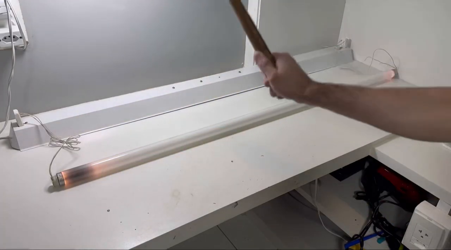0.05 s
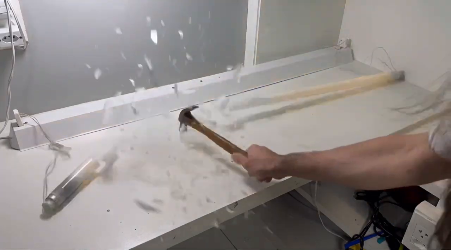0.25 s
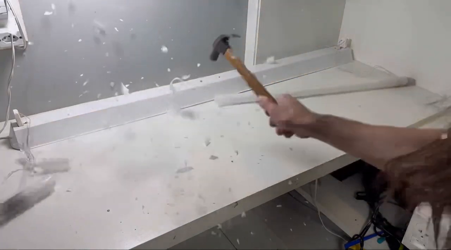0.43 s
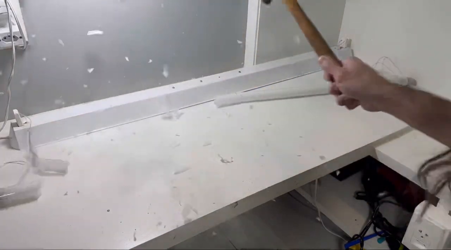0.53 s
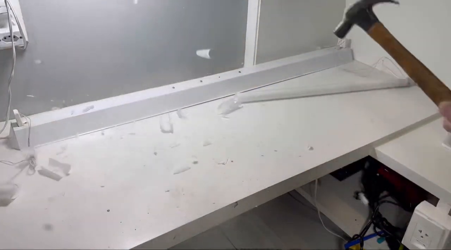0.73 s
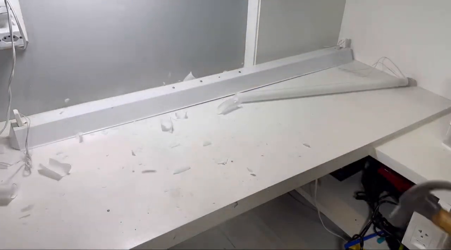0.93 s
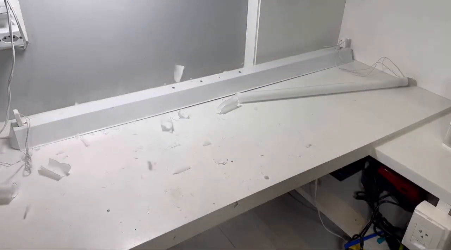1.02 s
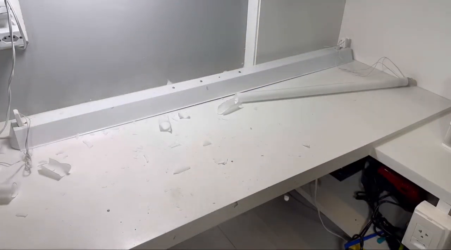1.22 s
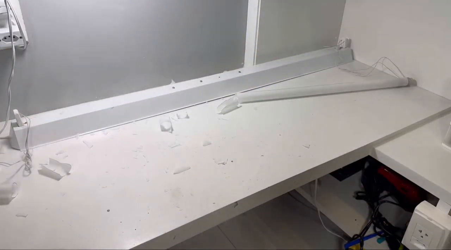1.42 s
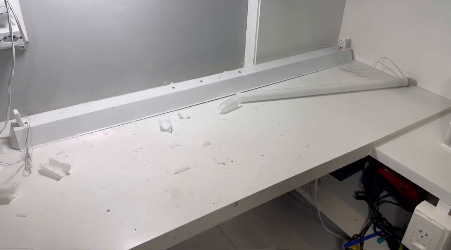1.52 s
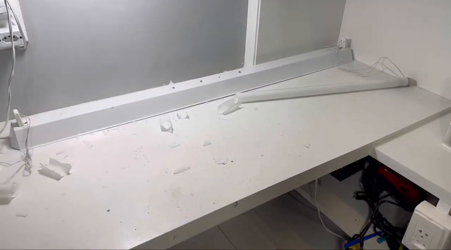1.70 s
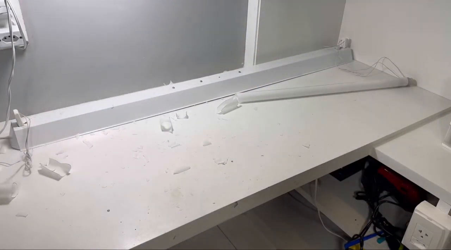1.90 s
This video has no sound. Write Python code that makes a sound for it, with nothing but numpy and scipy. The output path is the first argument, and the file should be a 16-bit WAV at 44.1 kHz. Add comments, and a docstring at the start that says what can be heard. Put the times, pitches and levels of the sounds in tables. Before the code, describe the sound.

Glass tube smashed by a hammer: brief electrical hum, loud explosive pop with a desk thump, dense bright glass rain, scattered knocks and sparse high tinkles fading into quiet, recorded close in a small room.

```python
"""In a small room, a hammer smashes a lit fluorescent tube on a desk.
The lamp's ballast buzzes (a stack of sine tones); the glass rings for an instant (fading tones) and cracks
(swelling noise), then the tube implodes with a boom that shakes the desk (dying noise and low tones).
Splinters shower down (many random taps), a long piece lands and rocks (wavering tones),
fragments knock (short noises), and the last small shards bounce and tinkle over a faint rumble and hiss."""
import sys
import numpy as np
from scipy import signal
from scipy.fft import rfft, irfft
from scipy.io import wavfile

SR = 44100
rng = np.random.default_rng(int(sys.argv[2]) if len(sys.argv) > 2 else 0)


def wav_out(sig):
    """Save sig, one row per channel (or a flat mono array), as 16-bit PCM at SR to the path in sys.argv[1]."""
    wavfile.write(sys.argv[1], SR, np.round(np.clip(np.atleast_2d(sig).T, -1, 1) * 32767).astype(np.int16))


N = 85995  # length of the scene in samples
T = np.arange(N) / SR  # time of each sample [s]
HZ = np.fft.rfftfreq(N, 1 / SR)  # frequencies in the spectrum of a full-length sound [Hz]
# Everywhere below, t60 is the time a sound takes to fall by 60 dB.


def amp(db):
    """Turns decibels into a gain."""
    return 10 ** (np.asarray(db) / 20)


def evened(x):
    """Scales a sound to an average strength (rms) of 1."""
    return x / np.sqrt(np.mean(x ** 2) + 1e-20)


def read(points, hz):
    """Reads a table between its points, on a log-frequency axis as the ear hears pitch."""
    f, value = np.transpose(points)
    return np.interp(np.log(hz + 1), np.log(f + 1), value)


def level(points):
    """Gives the gain over time from (time [s], level [dB]) points."""
    return amp(np.interp(T, *np.transpose(points)))


def at(s, x):
    """Delays a sound so that it starts at s seconds."""
    delay = max(round(s * SR), 0)
    channels_alone = [(0, 0)] * (x.ndim - 1)
    return np.pad(x, channels_alone + [(delay, 0)])[..., :N]


def lengthened(x):
    """Fills a short sound up with silence to the length of the scene."""
    return np.pad(x, (0, N - len(x)))


def colour(x, db):
    """Filters a sound by a gain in dB for each frequency."""
    return irfft(rfft(x) * amp(db), N)


def spread(x):
    """Makes two unrelated channels as alike as a diffuse sound is at the two microphones."""
    # likeness of left and right: (frequency [Hz], likeness [-1 to 1])
    likeness = [(60, .95), (170, .93), (350, .4), (800, 0.084), (2500, -0.092), (6000, 0), (9000, .3),
                (12000, 0.61), (15000, .3)]
    a, b = rfft(x)
    same = np.clip(read(likeness, HZ), -.99, .99)
    mid = a * np.sqrt((1 + same) / 2)
    side = b * np.sqrt((1 - same) / 2)
    return irfft(np.array([mid + side, mid - side]), N)


def noise(db):
    """Makes diffuse stereo noise with a given spectrum, scaled to rms 1."""
    return evened(colour(spread(rng.standard_normal((2, N))), db))


def dying(x, t60s, hold=0):
    """Holds a sound for a while, then lets each frequency band die at its own speed."""
    hz, t, bands = signal.stft(x, SR, nperseg=256)
    fall_s = np.maximum(t - hold, 0)
    bands = bands * amp(-60 * fall_s / read(t60s, hz)[:, None])
    return signal.istft(bands, SR, nperseg=256)[1][:, :N]


def ring(hz, db, t60):
    """One struck mode: a thing that is hit sings at its own pitch and fades steadily."""
    t = T[:int(2 * t60 * SR) + 2]
    return lengthened(amp(db - 60 * t / t60) * np.sin(2 * np.pi * hz * t))


def fluttering(hz, db, t60, depth):
    """A mode of a tumbling, rattling piece: its strength and phase waver at random as it fades."""
    flutter_hz = 45  # two new random values in each cycle
    t = T[:int(1.5 * t60 * SR) + 2]
    a, b = (np.interp(t * 2 * flutter_hz, np.arange(len(s)), s)
            for s in rng.standard_normal((2, 200)) / np.sqrt(2))
    turn = 2 * np.pi * hz * t
    wave = ((1 + depth * a) * np.sin(turn) + depth * b * np.cos(turn)) / np.hypot(1, depth)
    return lengthened(amp(db - 60 * t / t60) * wave)


def click(db):
    """The bright tick of glass touching something hard: a tiny burst of treble-heavy noise."""
    fade_s = .0015  # time to fall to about a third
    t = T[:N // 100]
    hiss = np.diff(rng.standard_normal(len(t) + 1))  # differences favour the treble
    return lengthened(amp(db) * evened(hiss) * np.exp(-t / fade_s))


def room(x, wet_db):
    """Adds the small room's tail: echoes so dense that they act like dying noise."""
    # how fast the tail dies: (frequency [Hz], t60 [s])
    room_t60 = [(100, 1.03), (1000, 0.49), (5000, 0.94), (15000, 0.5)]
    tail = dying(noise(0 * HZ), room_t60) * np.minimum(T / 0.0065, 1)  # builds up over 6.5 ms
    tail /= np.sqrt(np.sum(tail ** 2) / 2)
    return x + amp(wet_db) * signal.fftconvolve(np.atleast_2d(x), tail, axes=1)[:, :N]


def hammer():
    """The tube rings, a crack races through it with swelling noise, and the hammer head punches on."""
    # tones of the tube under the hammer, before it gives: (frequency [Hz], level [dB], t60 [s])
    tube = [(540, -29, 0.13), (3000, -42, .5), (5320, -37.5, .6), (6560, -38, 0.46), (7381, -44.5, .1),
            (10100, -49.5, .3)]
    # spectrum of the crack: (frequency [Hz], relative level [dB per Hz])
    crack_spectrum = [(59, -40), (100, -10.5), (1040, -2.5), (1840, -3.5), (2520, -18), (5280, -14.5),
                      (5870, -17), (7100, -5.5), (8230, -17.5), (13700, -17), (15500, -33)]
    touch_s, crack_s = .1865, .2145
    crack_db, grow_db_per_ms, fall_db_per_ms, crack_wet_db = -4.5, 3, 4, -13
    touch = at(touch_s, sum(ring(*mode) for mode in tube) * np.minimum(T / 0.0036, 1))
    ms = (T - crack_s) * 1000  # time before (-) and after (+) the loudest moment
    # the crack runs faster and faster, then stops
    swell_db = np.minimum(ms * grow_db_per_ms, -ms * fall_db_per_ms)
    crack = noise(read(crack_spectrum, HZ)) * amp(crack_db + np.maximum(swell_db, -200))
    push = at(crack_s, ring(hz=950, db=-10.5, t60=.022))
    touch = touch * np.clip(-ms, 0, 1)  # the ringing ends within the last millisecond
    return touch + room(crack + push, crack_wet_db)


def implosion():
    """Air slams into the tube as a burst of noise; desk and room boom at their own pitches."""
    # spectrum of the blast: (frequency [Hz], relative level [dB per Hz])
    blast_spectrum = [(18, -46), (30, -16.5), (81, -2.5), (126, -14), (164, -1), (277, -7.5), (315, -1),
                      (379, -9), (443, -2), (591, -23), (639, -14), (1200, -11), (1590, -20.5),
                      (1820, -21.5), (2070, -24), (11300, -30), (15500, -34)]
    # how fast the blast dies: (frequency [Hz], t60 [s])
    blast_t60 = [(50, .6), (150, 0.49), (400, .55), (1200, .55), (4000, 0.81), (14000, .8)]
    # tones of desk and room: (frequency [Hz], relative level [dB], t60 [s])
    desk_modes = [(53.3, -4.5, 0.55), (91, -2.5, 0.49), (178, -6.5, 0.56), (334.2, -2, 0.43),
                  (458.7, -2, 0.31), (660, -10, 0.44), (840, -6.5, 0.23), (902, -16, 0.57),
                  (975, -13.5, 0.33), (1073, -11.5, 0.42), (1213, -11.5, 0.32), (1268, -13, 0.63)]
    boom_s, rise_s, hold_s = .2245, .003, .025
    blast_db, desk_db = -11.5, -22
    blast = amp(blast_db) * dying(noise(read(blast_spectrum, HZ)), blast_t60, hold_s)
    desk = sum(rng.choice([-1, 1]) * ring(hz, db + desk_db, t60) for hz, db, t60 in desk_modes)
    return at(boom_s, (blast + desk) * np.minimum(T / rise_s, 1))


def shower(spectrum, loudness, low_hz, high_hz, per_s, t60, scatter_db, tick_db, count):
    """Many splinters, each with its own two pitches, tap down at random, left and right."""
    start_s, wet_db = .2245, -0.5
    out = np.zeros((2, N))
    for hz in np.geomspace(low_hz, high_hz, count):
        pitch, length, overtone, side = rng.random(4)
        hz = hz * (1 + .1 * (pitch - .5))
        low_tone = ring(hz, 0, t60 * (.5 + length))
        high_tone = ring(min(hz * (1.5 + overtone), SR / 2), -3, t60 / 2)
        tap = (low_tone + high_tone + click(tick_db))[:N // 12]
        struck = rng.random(N) < per_s / count / SR  # all splinters share per_s taps a second
        hits = struck * amp(scatter_db * np.minimum(rng.exponential(1, N), 3))
        pan = np.array([[np.cos(np.pi * side)], [np.sin(np.pi * side)]])
        out += pan * signal.oaconvolve(hits, tap)[:N]
    shaped = evened(colour(room(spread(out), wet_db), read(spectrum, HZ)))
    return shaped * level(loudness) * (T > start_s)


def falling_glass():
    """Coarse splinters, fine ones and a bright jingle of thin flakes: smaller glass taps higher."""
    # loudness of each shower: (time [s], level [dB])
    coarse_level, fine_level, flake_level = [(.22, -60), (.25, -42), (.5, -36), (.63, -42.5), (.8, -46),
                                             (.95, -47), (1.1, -56), (1.42, -60), (1.55, -63),
                                             (1.95, -71.5)], [(.22, -65), (.25, -37.5), (.45, -34.5),
                                                                   (.63, -40), (.77, -36), (.84, -35.5),
                                                                   (1, -41), (1.2, -42.5), (1.4, -48),
                                                                   (1.52, -55), (1.75, -56.5),
                                                                   (1.95, -64.5)], [(.22, -70),
                                                                                       (.26, -35),
                                                                                       (.42, -37),
                                                                                       (.6, -46),
                                                                                       (.75, -45),
                                                                                       (.82, -38), (1, -44),
                                                                                       (1.2, -49),
                                                                                       (1.4, -58),
                                                                                       (1.55, -58),
                                                                                       (1.7, -66),
                                                                                       (1.95, -78)]
    # tone colour put on each shower: (frequency [Hz], gain before levelling [dB])
    coarse_colour, fine_colour, flake_colour = [(100, -21), (300, -12), (750, -3), (1200, -4), (2500, -5),
                                                (5000, -21), (15000, -43)], [(500, -24), (2000, -8), (4000, 0),
                                                                (7000, 0), (10000, -0.5), (12000, -2),
                                                                (15500, -7)], [(1000, -25), (4000, -6),
                                                                              (8000, -1), (11500, 0),
                                                                              (15500, -3)]
    coarse = shower(coarse_colour, coarse_level, low_hz=450, high_hz=4001, per_s=500, t60=.05,
                    scatter_db=1.5, tick_db=-2, count=36)
    fine = shower(fine_colour, fine_level, low_hz=2498, high_hz=15050, per_s=600, t60=.03,
                  scatter_db=4.5, tick_db=9, count=40)
    flakes = shower(flake_colour, flake_level, low_hz=4000, high_hz=15000, per_s=130, t60=.06,
                    scatter_db=3, tick_db=0, count=70)
    return coarse + fine + flakes


def long_piece():
    """A length of tube lands and rocks; each touch wakes its modes in a different mix."""
    # tones of the piece, before random changes: (frequency [Hz], relative level [dB], t60 [s])
    piece_modes = [(765, -2, 0.04), (1754, -10.5, 0.46), (4385, -1, .7), (5790, -8, .45), (6588, -8, .5),
                   (7120, -5, .5), (8070, 3, .45), (9050, -5, .25), (9465, -9, .5), (11080, -1, .45),
                   (11400, -3, .15), (11900, -1, .15), (12770, 4, .18), (13900, -7, .12), (15150, -3, .2)]
    # its touches: (time [s], level [dB], brightness [dB per octave])
    landings = [(.778, -43, 3), (.785, -38.5, 1), (.793, -40, 3), (.802, -43, 2), (.853, -48, 0),
                (.94, -51, -1.5), (1.005, -52, 6), (1.062, -53, 8.5), (1.165, -49.5, 3), (1.205, -54, -1),
                (1.32, -66, -1)]
    scatter_db, detune, flutter = 2.5, .0025, 1.3  # detune is a share of the pitch
    click_db, wet_db = 11, -5
    out = np.zeros(N)
    for s, db, tilt_db in landings:
        touch = click(click_db)
        for hz, mode_db, t60 in piece_modes:
            a, b = rng.standard_normal(2)
            mixed_db = mode_db + scatter_db * b + tilt_db * np.log2(hz / 8000)
            touch = touch + fluttering(hz * (1 + detune * a), mixed_db, t60, flutter)
        out += at(s, amp(db) * touch)
    return room(out, wet_db)


def shards():
    """Small shards hit the desk and ping, some with a tick; the last pings share nearly one pitch."""
    # hits: (time [s], pitch [Hz], ring level [dB], t60 [s], tick level [dB])
    shard_hits = [(.3697, 13600, -27, .04, -30), (.373, 11900, -30, .04, -30),
                  (.4081, 11460, -27, .06, -31), (.523, 9500, -35, .08, -50), (.6216, 11400, -36, .04, -34),
                  (.692, 3960, -38, .08, -50), (.7204, 10300, -38, .06, -40), (.7852, 12830, -25, .08, -35),
                  (.91, 8800, -36, .15, -50), (.9638, 9020, -31, .12, -40), (1.0701, 12010, -31, .09, -50),
                  (1.196, 1000, -44, .09, -60), (1.225, 1948, -47, .2, -65), (1.343, 12010, -42, .1, -55),
                  (1.4577, 12010, -53, .25, -70), (1.556, 11780, -30, .09, -46),
                  (1.565, 11850, -30, .07, -52), (1.594, 11820, -39, .15, -65),
                  (1.787, 11820, -36.5, .08, -55), (1.8194, 11820, -40, .08, -80),
                  (1.862, 11800, -43, .12, -90), (1.922, 11800, -52, .1, -80)]
    flutter, wet_db = .45, -4.5
    pings = sum(at(s, fluttering(hz, db, t60, flutter) + click(tick_db))
                for s, hz, db, t60, tick_db in shard_hits)
    return room(pings, wet_db)


def knocks():
    """Heavier fragments land farther off on desk and floor: short, diffuse clatters around one pitch."""
    # knocks: (time [s], pitch [Hz], level [dB], width [octaves], t60 [s])
    knock_hits = [(.45, 760, -39, .2, .5), (.54, 580, -40, .2, .35), (.69, 780, -38, .11, .2),
                  (.72, 910, -41, 1.1, .2), (.787, 770, -36, .16, .36), (.786, 1700, -39, .5, .2),
                  (.935, 700, -43, .18, .35), (1.185, 180, -63, .5, .25), (1.375, 1020, -51, .13, .22),
                  (1.315, 4000, -52, .8, .3), (1.38, 2400, -50, .9, .5), (1.596, 1000, -51, .35, .25),
                  (1.605, 220, -66, .6, .5), (1.703, 3900, -49.5, .8, .33), (1.735, 4500, -56, .7, .25),
                  (1.86, 1100, -67, .8, .2)]
    rise = np.minimum(T / .003, 1)  # 3 ms
    out = np.zeros((2, N))
    for s, hz, db, width, t60 in knock_hits:
        octaves_away = np.log2((HZ + 1) / hz)
        clatter = noise(-20 * np.log10(1 + (octaves_away / width) ** 2))
        out += at(s, rise * amp(db - 60 * T / t60) * clatter)
    return out


def ballast():
    """Buzz at twice the mains rate with overtones; drops shortly before the hammer lands, stops at the break."""
    # balance of the overtones: (frequency [Hz], relative level [dB])
    buzz_balance = [(120, -3), (360, -16), (600, -6.5), (900, -4), (1300, -13), (1600, -4), (1950, -12),
                    (2550, -3), (3100, -16), (3700, -5), (4400, -16), (4900, -13), (5700, -29), (6600, -20),
                    (8000, -35), (12000, -45)]
    # strongest single tones, before the fade: (frequency [Hz], level [dB])
    buzz_lines = [(239.7, -54), (479.4, -57), (719.3, -53), (1679, -51.5), (2398, -61), (2518, -56)]
    # level of the whole buzz over time: (time [s], level [dB])
    buzz_level = [(0, -0.5), (.1, 0), (.14, -6), (.2, -10.5), (.25, -58.5)]
    buzz_hz, buzz_db = 120.1, -51
    t = T[:N // 6]
    hz = buzz_hz * np.arange(1, 100)
    gains = amp(read(buzz_balance, hz))
    gains = amp(buzz_db) * gains / np.linalg.norm(gains)
    tones = list(zip(hz, gains)) + [(f, amp(db)) for f, db in buzz_lines]
    buzz = np.zeros((2, len(t)))
    for f, gain in tones:
        # random start phase of each tone, in turns, slightly different left and right
        start = rng.random() + 0.22 * rng.random((2, 1))
        buzz += gain * np.sqrt(2) * np.sin(2 * np.pi * (f * t + start))
    return np.pad(buzz, ((0, 0), (0, N - len(t)))) * level(buzz_level)


def background():
    """The room's background: steady soft noise and a low rumble that swells after the smash and sinks."""
    # spectra of the steady noise and the rumble: (frequency [Hz], relative level [dB per Hz])
    air_spectrum, rumble_spectrum = [(30, -13), (130, -11), (230, -3), (400, -16), (1500, -18), (6000, -21),
                                     (9000, -21), (15000, -22)], [(20, -14), (35, -5), (52, -0.5), (80, -11), (200, -12),
                                                  (400, -20), (1000, -27), (8000, -65)]
    # loudness of the rumble: (time [s], level [dB])
    rumble_level = [(0, -53), (.18, -54), (.45, -47), (.68, -52), (.85, -59), (1, -65), (1.2, -69),
                    (1.4, -77), (1.95, -76)]
    air_db = -71
    air = amp(air_db) * noise(read(air_spectrum, HZ))
    rumble = level(rumble_level) * noise(read(rumble_spectrum, HZ))
    return air + rumble


def scene():
    """Smash, falling glass and buzz over the room's background."""
    smash = hammer() + implosion()
    glass = falling_glass() + long_piece() + shards() + knocks()
    return smash + glass + ballast() + background()


def record(dry):
    """Microphone colour and left-right balance, overload that clips the peaks, and a treble limit."""
    # colour of the microphones: (frequency [Hz], gain [dB])
    mic_colour = [(7100, 0.5), (7380, 0), (7560, -13.5), (7750, -2), (8050, -0.5)]
    # balance: (frequency [Hz], left minus right [dB])
    left_lean = [(60, 2), (300, 1.5), (1000, 3), (3000, 4.5), (6000, 7), (8000, 1.5), (15000, 0)]
    edge_hz = 15750
    halves = np.array([[.5], [-.5]])  # left gains half the lean, right loses half
    heard = colour(dry, read(mic_colour, HZ) + halves * read(left_lean, HZ))
    heard = np.clip(heard, -1, 1)
    low_pass = signal.firwin(511, edge_hz, window=("kaiser", 9), fs=SR)
    return signal.oaconvolve(heard, low_pass[None], "same")


dry = scene()
out = record(dry)
wav_out(out)
```